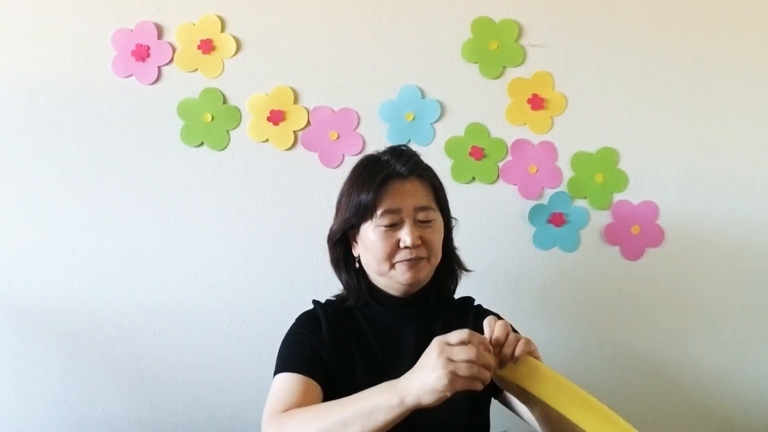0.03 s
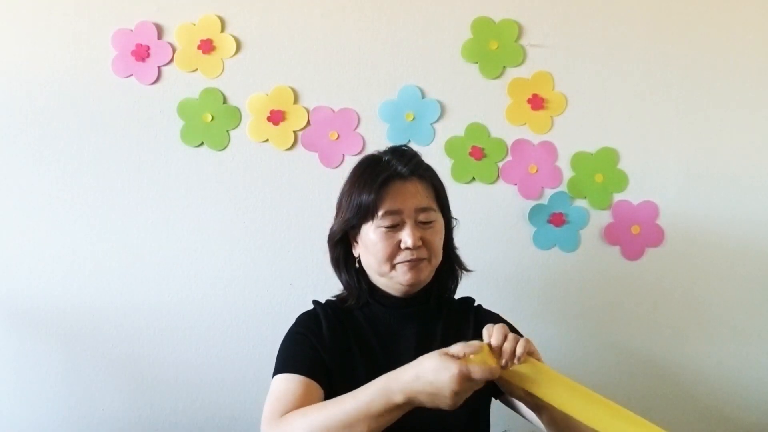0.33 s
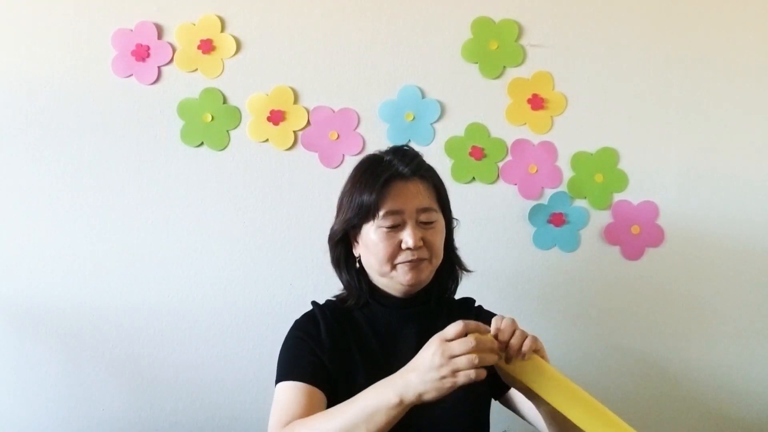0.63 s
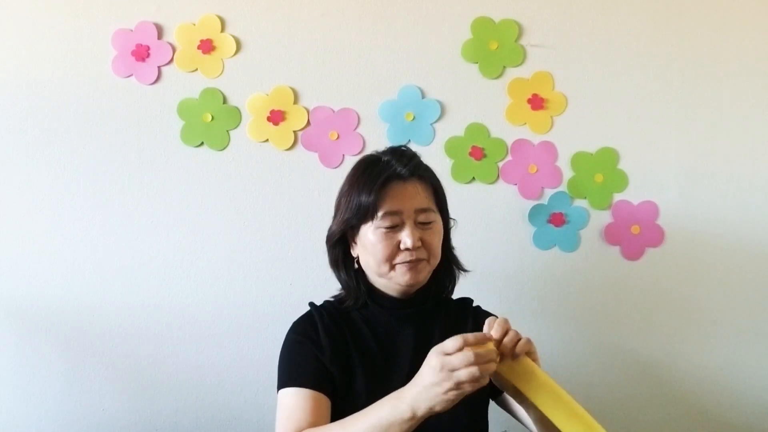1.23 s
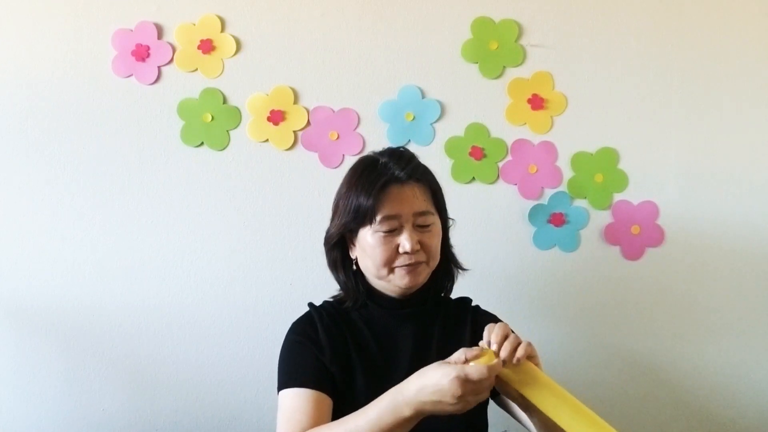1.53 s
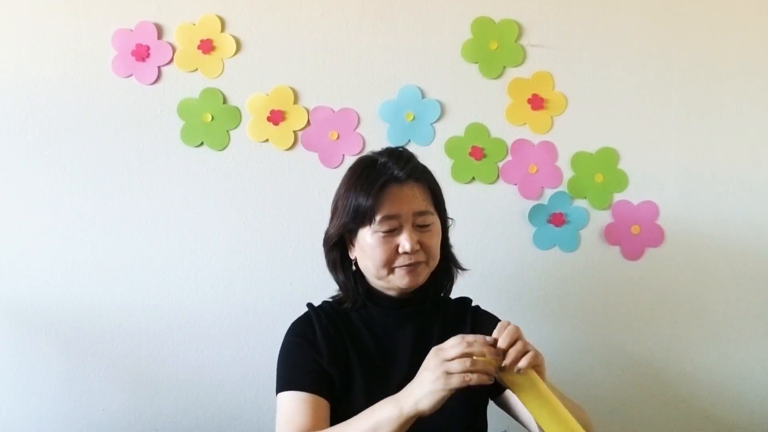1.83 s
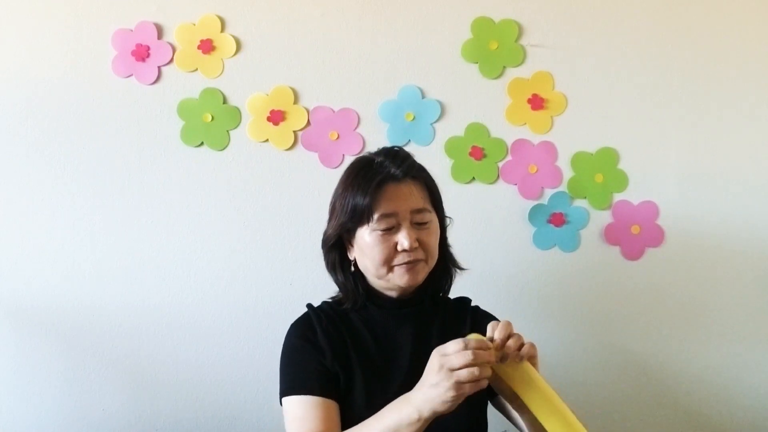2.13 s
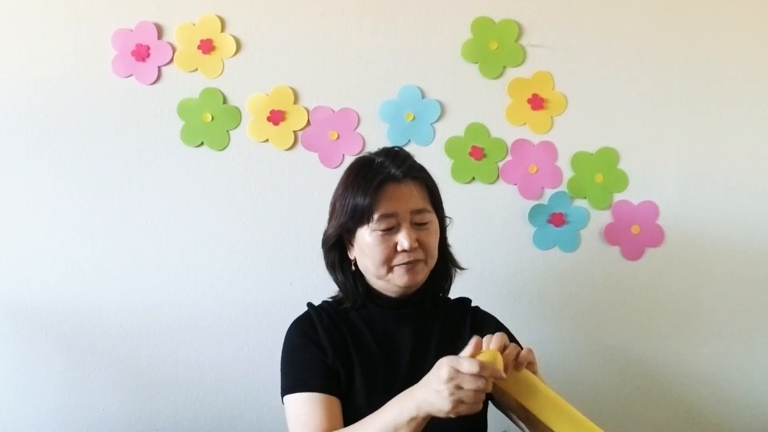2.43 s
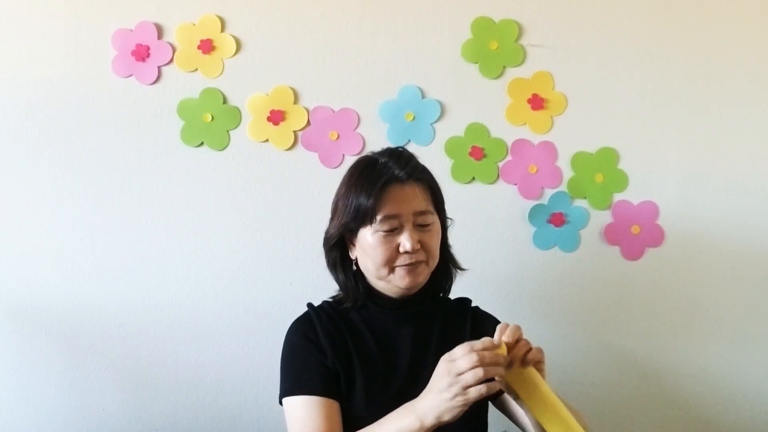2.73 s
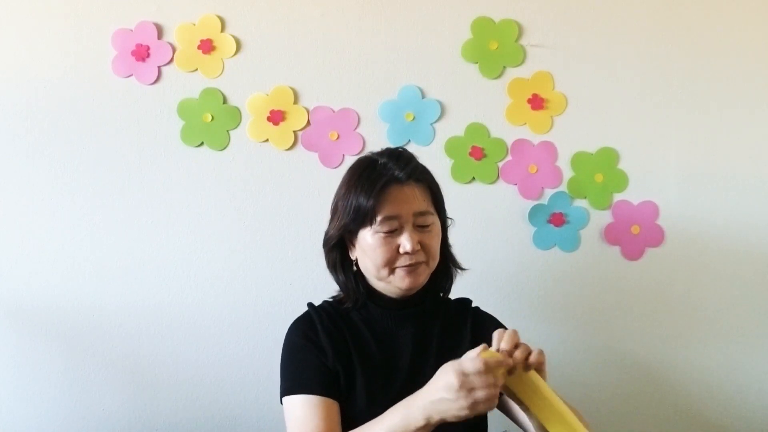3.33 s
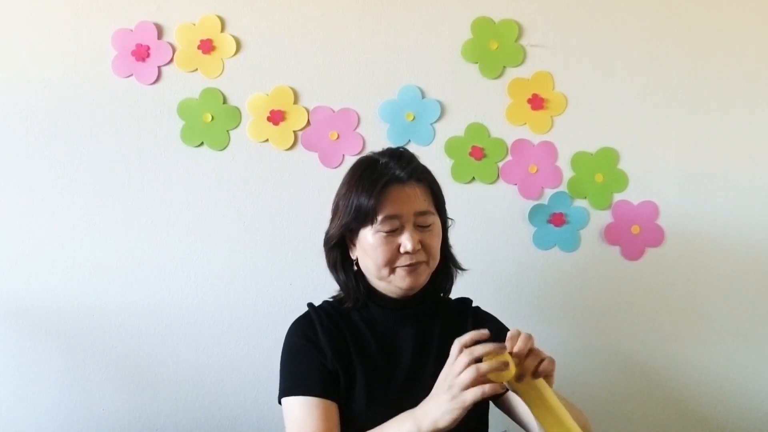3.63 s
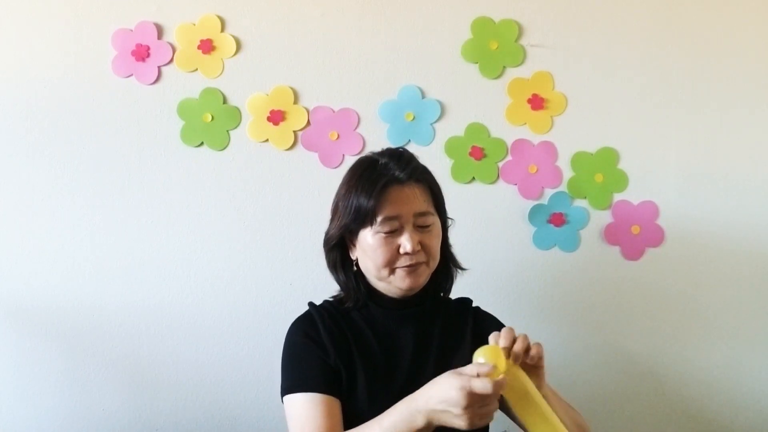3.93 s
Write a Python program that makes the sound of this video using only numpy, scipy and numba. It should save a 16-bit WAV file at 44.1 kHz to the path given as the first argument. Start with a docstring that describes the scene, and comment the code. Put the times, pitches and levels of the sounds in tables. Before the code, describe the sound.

Fingers rub and coil a long balloon, making rubbery rasps, squeaks and small snaps.

```python
"""A blown-up modelling balloon rasps as fingers roll and coil its end in seven strokes.
The skin sticks and slips on the rubber, and the many tiny slips make the balloon's wall ring.
Slips that fall into a steady rhythm become gliding squeaks. The rubber snaps where it lets go,
and fingertips knock softly on the tube. A small, bare room adds its echo and a faint rumble and hiss."""
import sys
import numpy as np
from scipy import signal
from scipy.fft import rfft, irfft
from scipy.io import wavfile
from scipy.ndimage import uniform_filter1d
from numba import njit

SR = 44100
rng = np.random.default_rng(int(sys.argv[2]) if len(sys.argv) > 2 else 0)


def generate_wav(signal):
    """Clip the signal to [-1, 1] and save it as 16-bit WAV at the path in sys.argv[1]."""
    frames = np.transpose(np.atleast_2d(signal))
    scaled = np.clip(frames, -1, 1) * 32767
    pcm = np.round(scaled).astype(np.int16)
    wavfile.write(sys.argv[1], SR, pcm)


N = 176400


def undb(db):
    """Turn decibels into a number to multiply by."""
    return 10 ** (np.asarray(db) / 20)


def unit(x):
    """Scale a sound so its average level (rms) is 1."""
    return x / np.sqrt(np.mean(x ** 2))


def unit_energy(x):
    """Scale a sound so its total energy is 1."""
    return x / np.sqrt(np.sum(x ** 2))


def even(x):
    """Even out slow swells, holding the level near 1."""
    return x / np.sqrt(uniform_filter1d(x ** 2, size=1500) + 1e-9)


def colour(x, points):
    """Shape the tone along (frequency [Hz], level [dB]) points."""
    hz, db = np.array(points, float).T
    f = np.maximum(np.fft.rfftfreq(4096, 1 / SR), 1)
    cepstrum = irfft(np.log(undb(np.interp(np.log(f), np.log(hz), db))))
    cepstrum[1:2048] *= 2  # folded so the filter rings only after a sound, never before
    cepstrum[2049:] = 0
    return signal.fftconvolve(x, irfft(np.exp(rfft(cepstrum))))[:len(x)]


def delay(x, seconds):
    """Make a sound arrive later, even by part of a sample."""
    f = np.fft.rfftfreq(len(x), 1 / SR)
    return irfft(rfft(x) * np.exp(-2j * np.pi * f * seconds), len(x))


def wander(per_second):
    """A smooth random wobble with a typical size of 1."""
    hold = int(SR / per_second)
    return unit(uniform_filter1d(rng.standard_normal(N)[np.arange(N) // hold], hold))


@njit
def resonate(x, hz, width):
    """Keep the sound near a moving pitch; width is a share of that pitch."""
    y, band, low = np.empty(len(x)), 0., 0.
    for i in range(len(x)):
        g = np.tan(np.pi * hz[i] / SR)
        v = (band + g * (x[i] - low)) / (1 + g * (g + width))
        band, low, y[i] = 2 * v - band, low + 2 * g * v, width * v
    return y


# Tone of the room's own noise: (frequency [Hz], relative level [dB])
AIR_TONE = [(20, -46), (42, 11), (75, 9.5), (120, 14), (170, 3.5), (260, -46), (600, -40), (2000, -13),
            (16000, -51)]
def air(level_db=-70):
    """Faint rumble and hiss of the room, mostly shared by left and right."""
    shared, left, right = (unit(colour(rng.standard_normal(N), AIR_TONE)) for _ in range(3))
    return undb(level_db) * (np.array([[1.2], [.8]]) * shared + 0.48 * np.array([left, right]))


# How long the echo lasts: (frequency [Hz], time to fade by 60 dB [s])
ECHO_FADE = [(150, 0.36), (600, 0.14), (2000, 0.22), (6000, 0.25), (15000, 0.25)]
def reflections(alike_below_hz=740, build_up_s=0.0021):
    """The walls' echo of a click from one spot, alike on both sides in the bass."""
    t = np.arange(16384) / SR
    f = np.fft.rfftfreq(len(t), 1 / SR)
    mid, side = rfft(rng.standard_normal((2, len(t))))
    alike = 1 / (1 + (f / alike_below_hz) ** 2)
    spectrum = mid * np.sqrt(1 + alike) + np.array([[1], [-1]]) * side * np.sqrt(1 - alike)
    hz, fades = np.array(ECHO_FADE).T
    tail = 0
    for share, fade_s in zip(np.eye(len(hz)), fades):
        band = irfft(spectrum * np.interp(np.log(f + 1), np.log(hz), share), len(t))
        tail += band * undb(-60 * t / fade_s)
    return np.sqrt(2) * unit_energy(tail * np.clip(2 * t / build_up_s - 1, 0, 1))


# Notes the room rings at, its standing waves: (pitch [Hz], relative level [dB])
ROOM_NOTES = [(297, -32), (624, -32), (753, -31), (1023, -34), (1311, -35), (1442, -34), (1936, -33),
              (2476, -34)]
def room(x, move_s=.016, ring_s=.26):
    """Every move_s a new spot of the balloon sounds, with its own echo; the room's notes stay put."""
    hop, out = int(move_s * SR), np.zeros((2, 2 * N))
    fade = np.sin(np.pi * np.arange(2 * hop) / (2 * hop))
    padded = np.pad(x, (hop, 2 * hop))
    for i in range(0, N + hop, hop):
        echo = signal.fftconvolve((padded[i:i + 2 * hop] * fade)[None], reflections(), axes=1)
        out[:, i:i + echo.shape[1]] += echo
    t = np.arange(SR // 2) / SR
    dying = undb(-60 * t / ring_s)
    notes = sum(undb(db) * unit_energy(np.sin(2 * np.pi * hz * t) * dying) for hz, db in ROOM_NOTES)
    return out[:, hop:hop + N] + signal.fftconvolve(x, notes)[:N]


# Soft finger bumps: (time [s], relative level [dB], pitch [Hz])
FINGER_KNOCKS = [(2.289, -28.5, 363), (2.576, -37, 402), (3.001, -56, 81), (3.444, -49.5, 77),
                 (3.61, -47.5, 200), (3.912, -41, 388)]
def knocking(decay_cycles=1.1):
    """A fingertip bumps the tube, which swings a few times."""
    out = np.zeros(N)
    for start, db, hz in FINGER_KNOCKS:
        cycles = np.maximum(np.arange(N) / SR - start, 0) * hz
        swing = (1 - np.exp(-2 * cycles)) * np.exp(-cycles / decay_cycles)
        out += 2 * undb(db) * np.sin(2 * np.pi * cycles) * swing
    return out


GRIP_CHANGES_PER_S, GRIP_DB = 190.4, 2  # the changing grip makes squeaks and slips flutter

# Squeaks: (start [s], end [s], first pitch [Hz], last pitch [Hz], relative level [dB])
SQUEAK_GLIDES = [(.245, .3, 1440, 1170, -39), (.318, .37, 880, 980, -39), (.326, .378, 2950, 2250, -32),
                 (.81, .945, 1270, 2150, -35.5), (2.212, 2.3, 460, 350, -42)]
def squeaking(wobble=.045, wobbles_per_s=500, overtone_db=-8):
    """Slips lock into a steady rhythm: a gliding, slightly shaky tone with two overtones."""
    t, out = np.arange(N) / SR, np.zeros(N)
    for start, end, first_hz, last_hz, db in SQUEAK_GLIDES:
        along = np.clip((t - start) / (end - start), 0, 1)
        hz = first_hz * (last_hz / first_hz) ** along * (1 + wobble * wander(wobbles_per_s))
        phase = 2 * np.pi * np.cumsum(hz) / SR
        tone = unit(sum(undb(overtone_db * k) * np.sin((k + 1) * phase) for k in range(3)))
        swell = 2 * np.sqrt(along * (1 - along))
        out += undb(db + GRIP_DB * wander(GRIP_CHANGES_PER_S)) * tone * swell
    return out


# Snaps, with relative levels: (time [s], thump [dB], crack [dB], tick [dB], ring pitch [Hz])
RUBBER_SNAPS = [(0.021, -61, -31.5, -50, 2820), (0.043, -53, -25, -30.5, 4100),
                (0.258, -40, -23, -37, 1140), (0.275, -60, -27, -34, 1130), (0.32, -58, -23.5, -28.5, 2080),
                (0.431, -49.5, -26.5, -48, 1030), (0.728, -60, -43, -53, 960),
                (0.798, -56, -28.5, -27.5, 3070), (1.3222, -57, -27, -33.5, 2750),
                (1.326, -70, -30.5, -26, 4050), (1.4, -63, -27.5, -29.5, 4180),
                (1.4358, -64, -18.5, -36, 1290), (1.439, -38, -24, -31.5, 1280),
                (1.516, -36, -32, -30.5, 1250), (2.051, -61, -27, -39.5, 2310), (2.26, -61, -29, -38, 1400),
                (2.29, -32, -25, -49, 1900), (2.367, -60, -44, -37.5, 2000), (2.576, -34.5, -40, -46, 2630),
                (2.8459, -75, -26.5, -27.5, 2730), (2.883, -70, -27, -29.5, 2040),
                (2.9892, -42, -24.5, -33, 2880), (2.992, -56, -24, -29.5, 1380),
                (3.099, -38.5, -23, -32, 1020), (3.195, -72, -37.5, -49, 3360),
                (3.251, -74, -38, -46.5, 2320), (3.4324, -70, -16.5, -31.5, 1530),
                (3.433, -58, -18, -30, 2920), (3.439, -36, -22, -34, 1760), (3.7818, -69, -42, -47.5, 2820),
                (3.8564, -53.5, -21.5, -21.5, 2300), (3.906, -29.5, -22.5, -28.5, 2300)]
def snapping(ring_width=0.44, ring_db=1.5):
    """The rubber lets go: a low thump, a crack that rings the balloon's wall and a bright tick."""
    out, t = np.zeros(2 * N), np.arange(2048) / SR
    decay_s = np.array([[0.0014], [0.0029], [0.00079]])  # thump, crack, tick
    for start, thump_db, crack_db, tick_db, hz in RUBBER_SNAPS:
        bursts = rng.standard_normal((3, len(t))) * np.exp(-t / decay_s)
        flat = irfft(np.exp(1j * np.angle(rfft(bursts))))  # every frequency equally strong
        thump, crack, tick = flat * (t < t[-1] / 2)
        pitch = np.full(len(t), float(hz))
        ring = resonate(resonate(crack, pitch, ring_width), pitch, ring_width)
        wall = unit_energy(colour(crack, RASP_TONE)) + undb(ring_db) * unit_energy(ring)
        snap = (undb(thump_db - 8) * unit_energy(colour(thump, THRUM_TONE))
                + undb(crack_db - 3.5) * unit_energy(wall)
                + undb(tick_db + 2.5) * unit_energy(colour(tick, TREBLE_TONE)))
        i = int(start * SR)
        out[i:i + len(t)] += snap * np.sqrt(.004 * SR)  # as much energy as 4 ms at these levels
    return out[:N]


# The balloon's low, middle and high tone, shared with the snaps: (frequency [Hz], relative level [dB])
THRUM_TONE = [(60, -35), (150, 0.5), (250, -10.5), (380, 3), (550, 7), (700, 2), (1000, -11.5),
              (2000, -85.5)]
RASP_TONE = [(250, -24), (500, -8.5), (750, -5.5), (1100, 3), (1900, 2.5), (2800, 4), (4200, -2.5),
             (5500, -8), (9000, -34)]
TREBLE_TONE = [(1500, -65), (3500, -1), (5000, 0.5), (7000, 1.5), (10000, 2), (13500, -1), (16000, -8.5)]
# Low groan of the tube: (time [s], pitch [Hz])
TUBE_GROAN = [(.28, 630), (.45, 745), (1.55, 680), (1.72, 570), (2.1, 555), (2.23, 430), (2.3, 345),
              (2.55, 483), (3.11, 650), (3.5, 477), (3.62, 216), (3.8, 560)]
# Ring of the stretched patch under the fingers: (time [s], pitch [Hz], relative level [dB])
PATCH_RING = [(.21, 1530, -4), (.25, 1340, 11), (.29, 1130, -16), (.32, 1490, -18), (.337, 2630, 11),
              (.375, 2290, -8), (.435, 1060, 5), (0.749, 1000, -8), (.83, 1240, 4), (.89, 1620, 1),
              (.94, 2220, 1), (0.976, 1030, 9), (1.269, 1210, 4), (1.37, 960, 10), (1.46, 1330, -1),
              (1.57, 1200, 7.5), (1.72, 840, 3), (1.93, 1050, 7), (2.07, 1870, 1), (2.3, 1470, 0),
              (2.52, 1720, 1), (2.8, 1300, 1), (3.11, 814, -6), (3.55, 1050, 8.5), (3.82, 1040, 7.5)]
def balloon_wall(slips, patch_width=.18, groan_width=0.97, groan_db=6.5):
    """Slips make the tube groan and the stretched patch ring, giving thrum, rasp and treble."""
    t = np.arange(N) / SR
    times, hz, db = np.array(PATCH_RING).T
    patch_hz = np.interp(t, times, hz) * np.exp(.07 * wander(per_second=30))  # the stretch is unsteady
    groan_hz = np.interp(t, *np.array(TUBE_GROAN).T)
    thrum, rasp, treble = (colour(slips, tone) for tone in (THRUM_TONE, RASP_TONE, TREBLE_TONE))
    thrum = thrum + undb(groan_db) * resonate(thrum, groan_hz, groan_width)
    rasp = rasp + undb(np.interp(t, times, db) - 0.5) * resonate(rasp, patch_hz, patch_width)
    return even(thrum) * undb(-9), even(rasp) * undb(1.5), even(treble) * undb(1)


# One list of relative levels for each stroke: (time [s], thrum [dB], rasp [dB], treble [dB])
FINGER_STROKES = [
    [(0, -44, -42, -48), (0.06, -45.5, -37, -36.5), (0.1, -44.5, -44, -47), (0.17, -49, -42, -40.5),
     (0.22, -45, -47, -48), (0.24, -41.5, -35.5, -38), (0.28, -30.5, -34, -36.5), (0.31, -55, -34, -38.5),
     (0.325, -42, -30.5, -29), (0.35, -62, -27, -32.5), (0.39, -42, -39, -42.5), (0.44, -43.5, -42, -42.5),
     (0.475, -87, -37, -57), (0.5, -83, -64, -63), (0.57, -99, -59, -56), (0.61, -89, -83, -88)],
    [(0.643, -88, -67.5, -61), (0.69, -58, -56.5, -57), (0.722, -59, -64, -75), (0.74, -40.5, -49.5, -51.5),
     (0.77, -80, -44.5, -48), (0.805, -80, -37.5, -42), (0.86, -70, -35.5, -39), (0.915, -66, -31.5, -35),
     (0.945, -42.5, -47.5, -47.5), (0.99, -43.5, -37, -43.5), (1.02, -49, -60, -81), (1.06, -95, -91, -77)],
    [(1.18, -66, -81, -74), (1.26, -51, -43.5, -48), (1.3, -72, -54, -55.5), (1.38, -53, -46.5, -49),
     (1.42, -42.5, -37.5, -39), (1.46, -42.5, -49, -49), (1.513, -70, -40.5, -49),
     (1.53, -38, -34.5, -35.5), (1.58, -40, -33.5, -40.5), (1.61, -57, -48.5, -46),
     (1.645, -81, -47, -48.5), (1.665, -47.5, -35, -39.5), (1.715, -39.5, -47, -50.5),
     (1.79, -102, -76, -69)],
    [(1.87, -98, -69, -62), (1.908, -61, -57.5, -61), (1.925, -71, -43.5, -55), (1.97, -69, -48.5, -51),
     (2.045, -70, -47, -46.5), (2.056, -44, -31, -34), (2.1, -36, -32.5, -33), (2.17, -64, -39, -39),
     (2.2, -63, -31, -31), (2.235, -31, -34, -36.5), (2.31, -48.5, -39, -39.5), (2.355, -71, -56, -58),
     (2.372, -82, -37, -38.5), (2.395, -41, -44, -42.5), (2.455, -76, -33.5, -34),
     (2.495, -82, -39.5, -39.5), (2.52, -38, -30, -28), (2.55, -52, -49, -76), (2.575, -41.5, -41, -58),
     (2.62, -81, -65, -63)],
    [(2.762, -58, -78, -73), (2.78, -59, -50.5, -59), (2.81, -76, -44.5, -44), (2.87, -70, -46, -51),
     (2.95, -43, -41.5, -38.5), (3.0, -50, -39, -52), (3.04, -43, -47, -49), (3.07, -44, -39.5, -44),
     (3.097, -46, -41, -47), (3.103, -41.5, -26.5, -31.5), (3.135, -42, -80, -74), (3.22, -85, -73, -84),
     (3.3, -55, -61, -54.5)],
    [(3.31, -99, -60.5, -64.5), (3.39, -51, -44, -45), (3.45, -51, -46, -42), (3.5, -33, -39, -39),
     (3.55, -61, -43, -51), (3.6, -45, -55, -48.5), (3.66, -91, -89, -95)],
    [(3.75, -65, -67, -67), (3.779, -68, -56.5, -66), (3.785, -50, -46.5, -46), (3.82, -50, -43.5, -51.5),
     (3.85, -46, -51, -45), (3.9, -54, -40.5, -38), (3.93, -46, -41.5, -52), (3.98, -45, -51, -54),
     (4.0, -63, -46, -47)],
]
def rubbing(slips_per_s=2000, scatter_db=3, settle_s=0.0037):
    """Fingers stick and slip on the rubber; tiny slips come in flurries as the grip changes."""
    t, out = np.arange(N) / SR, np.zeros(N)
    sizes = undb(scatter_db * np.minimum(rng.exponential(size=N), 4))
    slips = (rng.random(N) < slips_per_s / SR) * sizes * rng.choice([-1, 1], N)
    grip = undb(GRIP_DB * wander(GRIP_CHANGES_PER_S))
    layers = balloon_wall(even(slips * grip))
    for stroke in FINGER_STROKES:
        times, *levels = np.array(stroke).T
        touching = (t >= times[0]) & (t <= times[-1])
        settle = np.minimum((t[touching] - times[0]) / settle_s, 1)  # the fingers settle on the rubber
        for layer, db in zip(layers, levels):
            out[touching] += settle * layer[touching] * undb(np.interp(t[touching], times, db))
    return out


def scene(direct_db=-4, direct_pan_db=6.5, room_db=-2, room_pan_db=2.5, left_lag_s=.00006):
    """The balloon in its room: louder on the left, and reaching the right a hair sooner."""
    balloon = rubbing() + squeaking() + snapping() + knocking()
    sides = np.array([[.5], [-.5]])
    direct = np.array([delay(balloon, left_lag_s), balloon]) * undb(direct_db + direct_pan_db * sides)
    return direct + room(balloon) * undb(room_db + room_pan_db * sides) + air()


def record(dry, top_hz=16100):
    """Cut away the very highest treble."""
    return signal.sosfilt(signal.ellip(10, .2, 70, top_hz, fs=SR, output="sos"), dry)


dry = scene()
out = record(dry)
generate_wav(out)
```